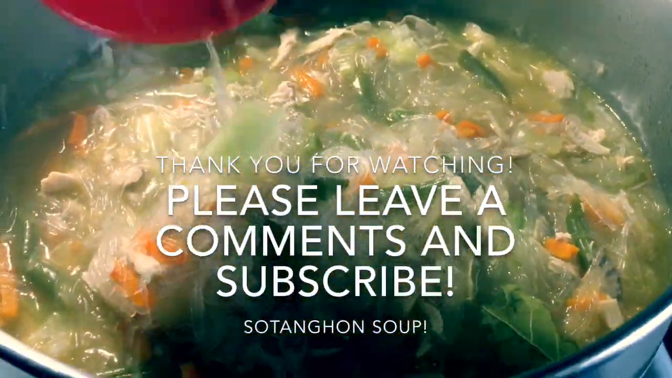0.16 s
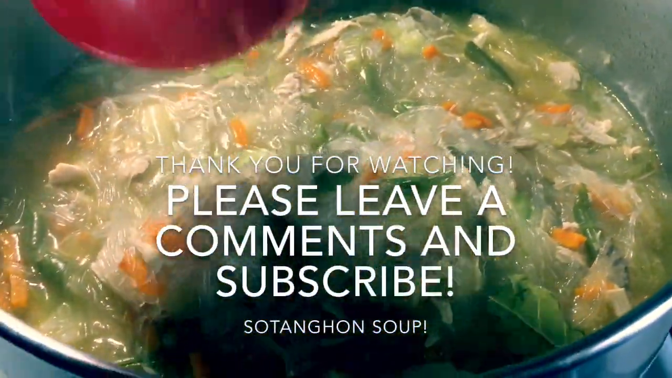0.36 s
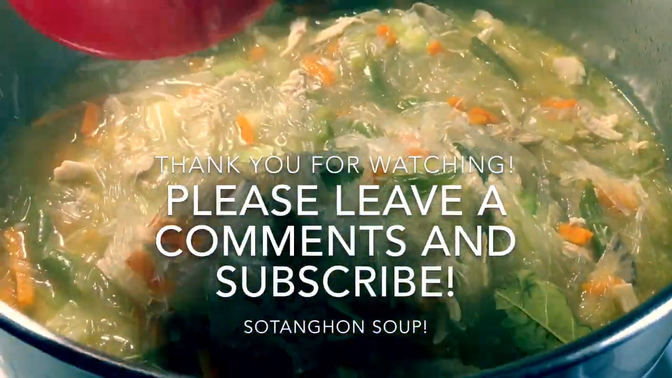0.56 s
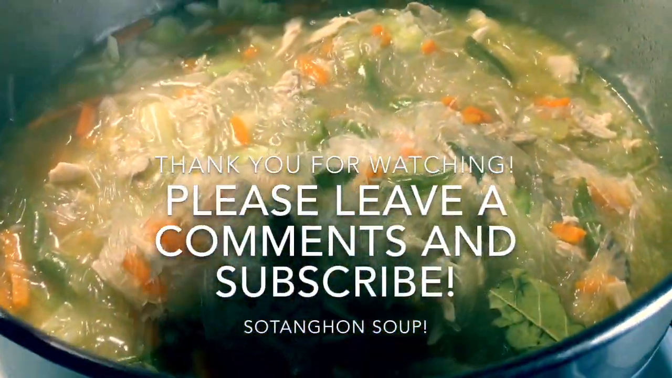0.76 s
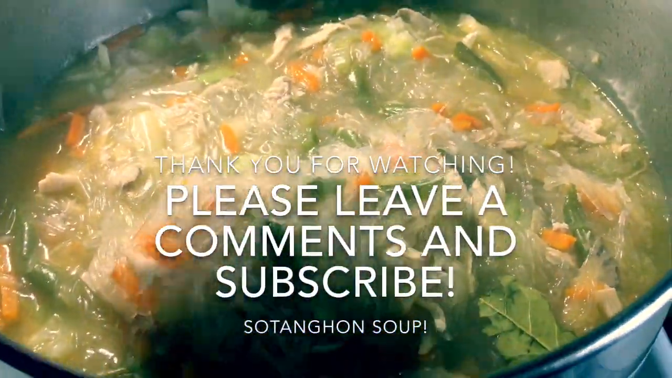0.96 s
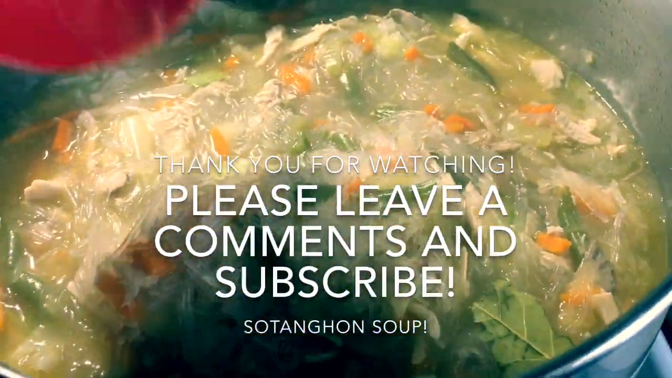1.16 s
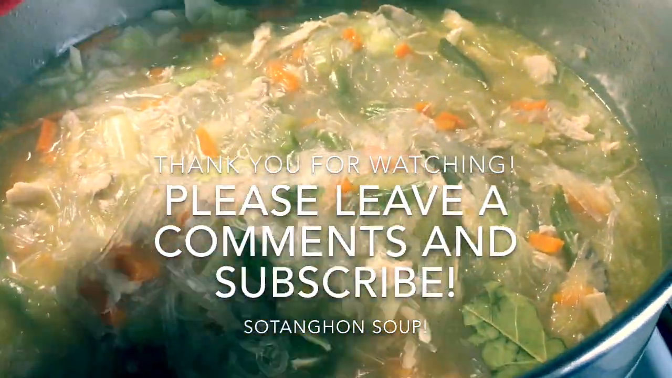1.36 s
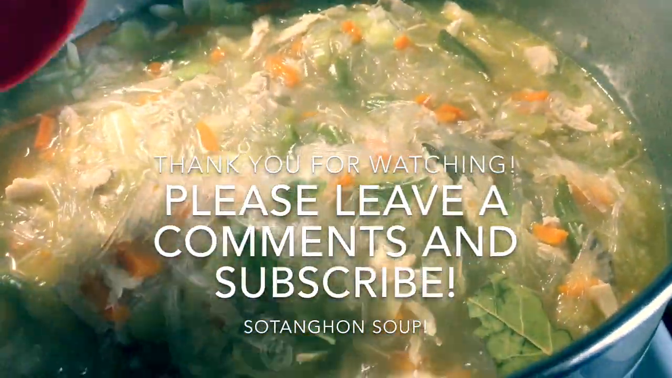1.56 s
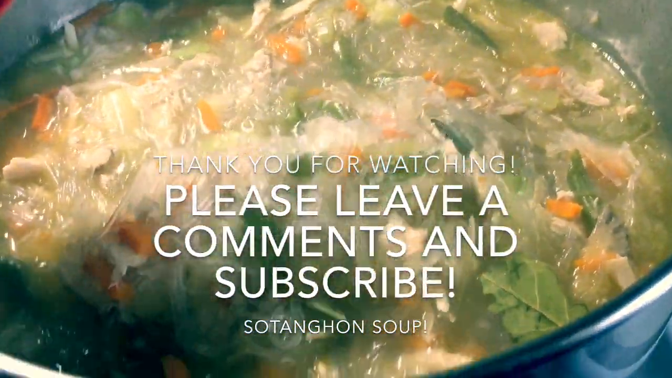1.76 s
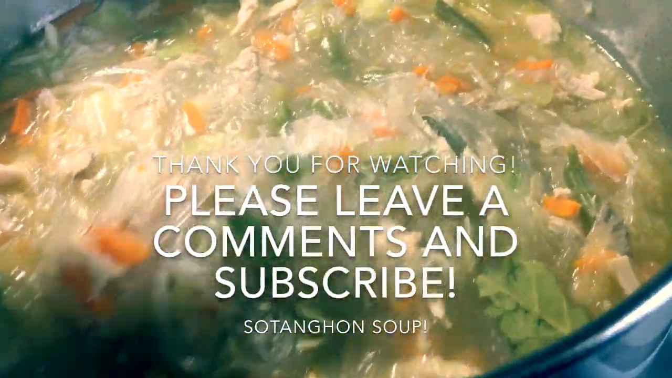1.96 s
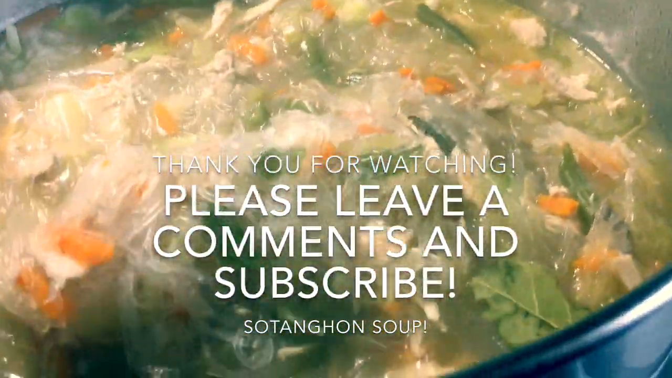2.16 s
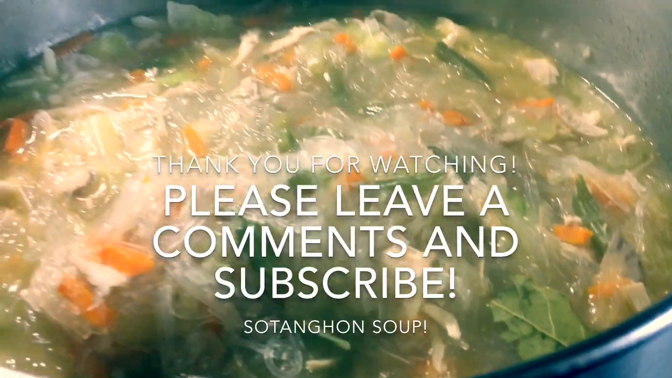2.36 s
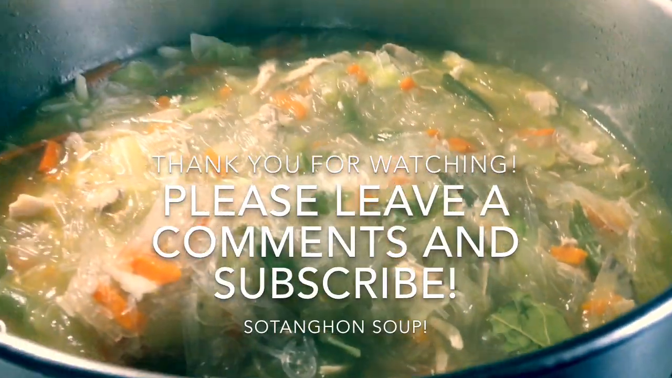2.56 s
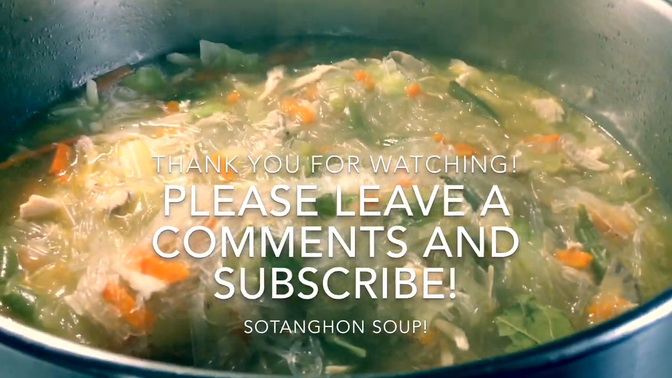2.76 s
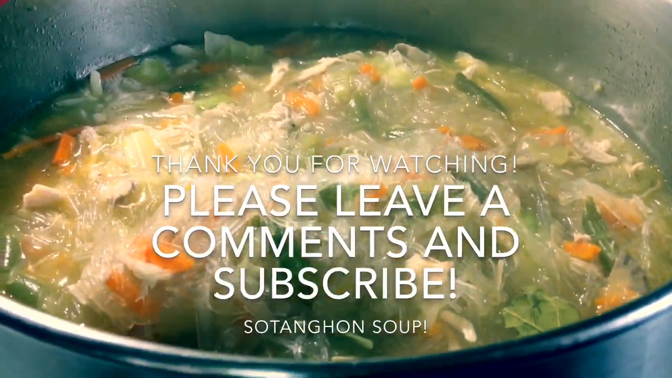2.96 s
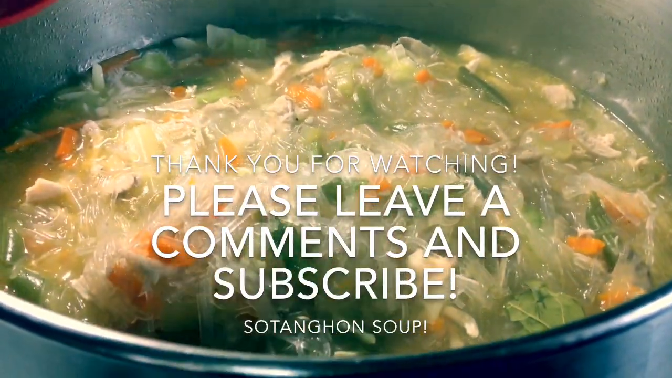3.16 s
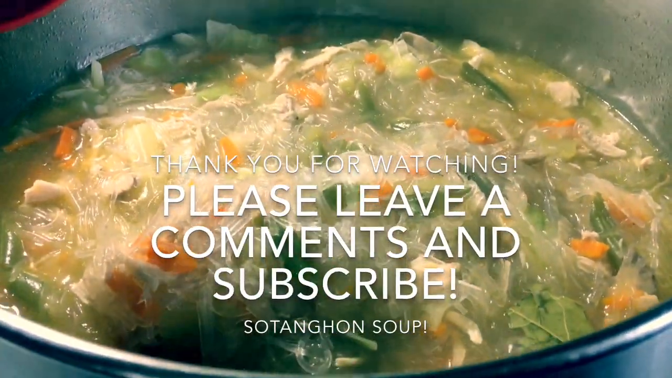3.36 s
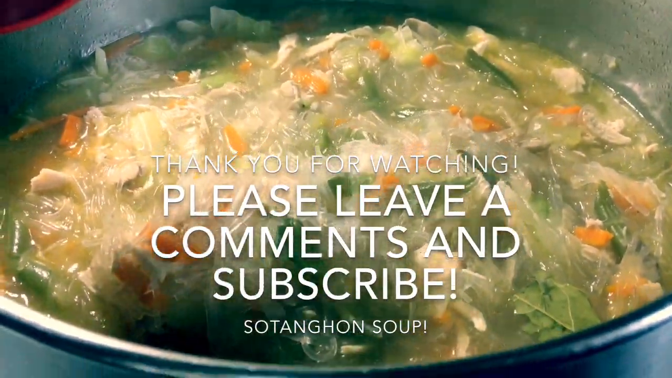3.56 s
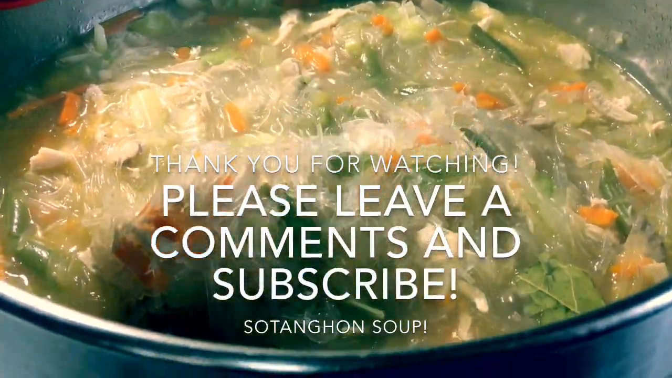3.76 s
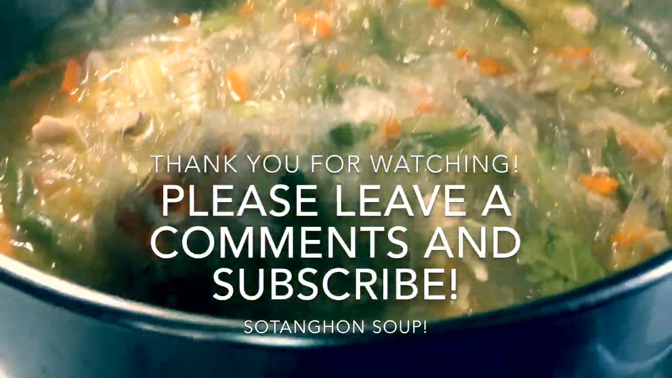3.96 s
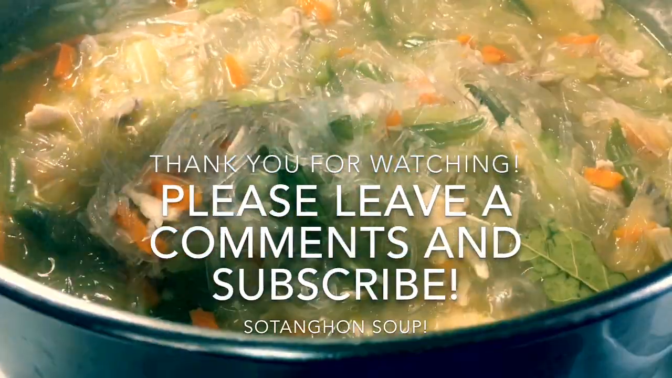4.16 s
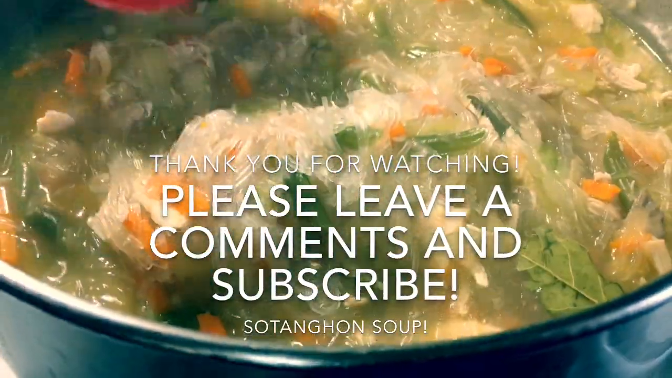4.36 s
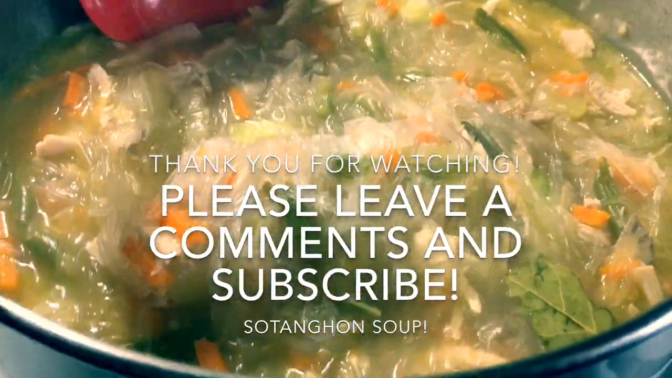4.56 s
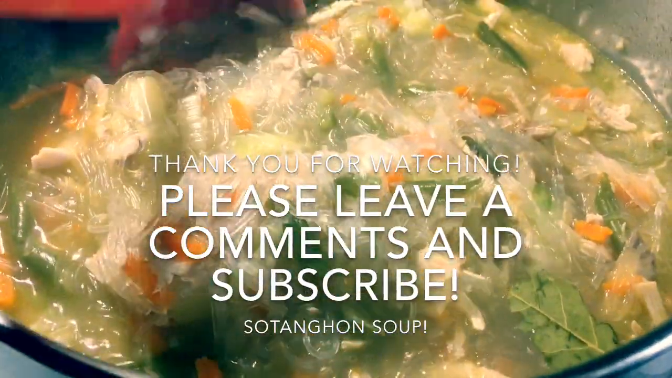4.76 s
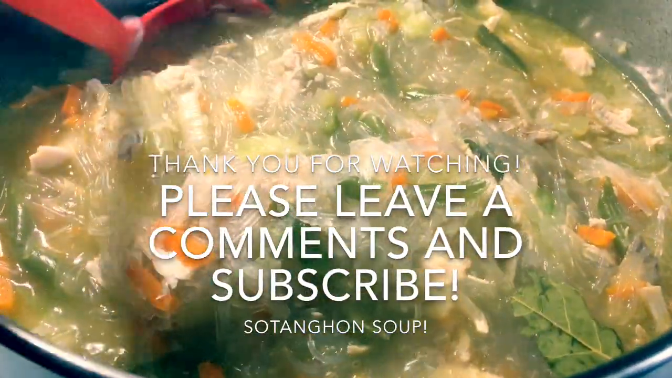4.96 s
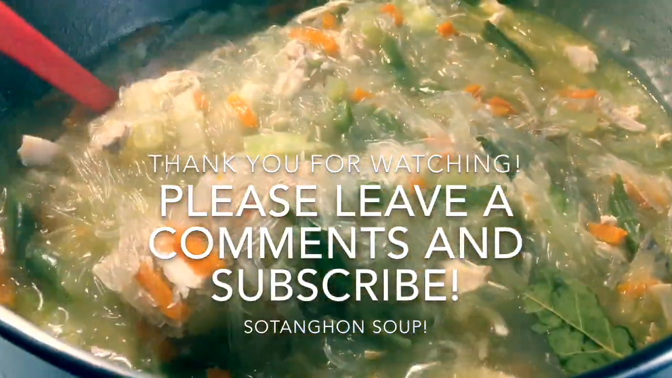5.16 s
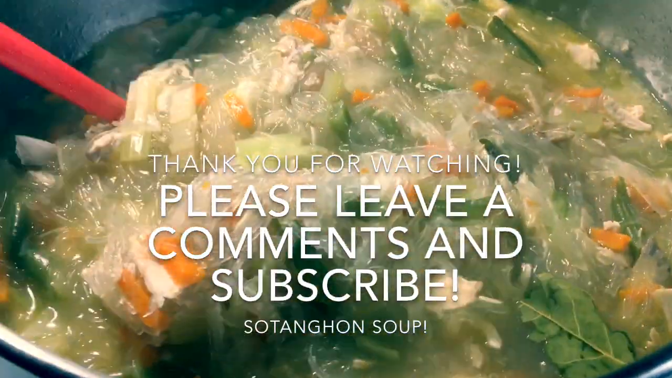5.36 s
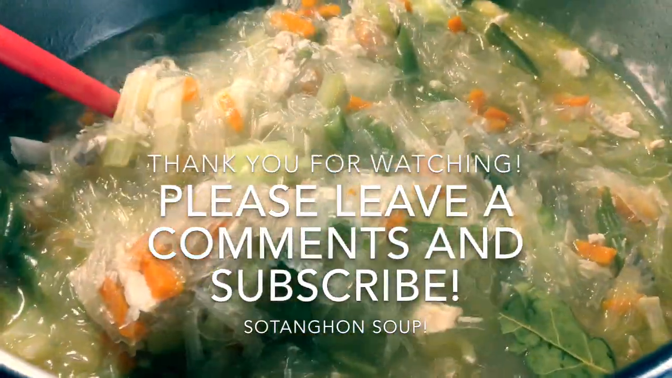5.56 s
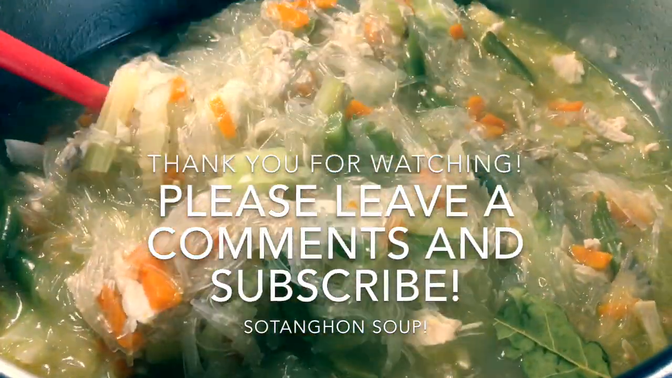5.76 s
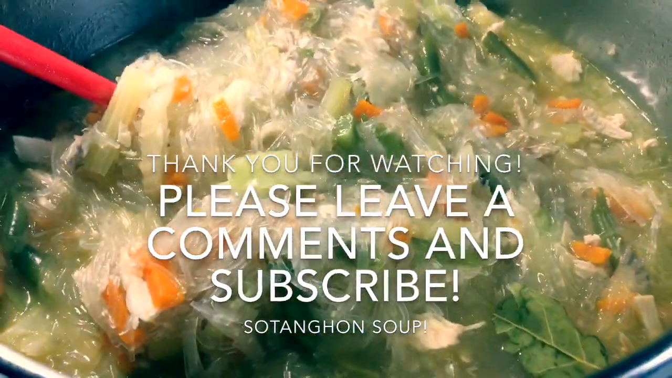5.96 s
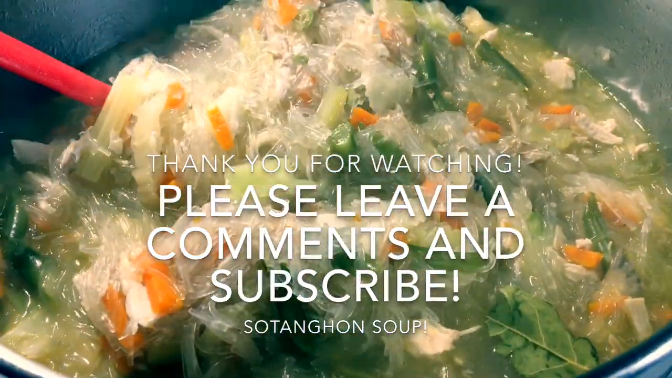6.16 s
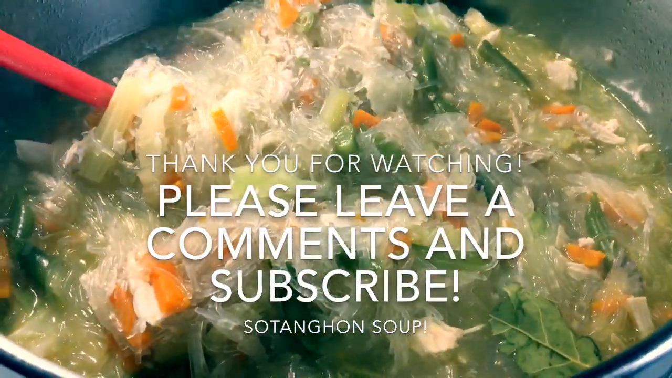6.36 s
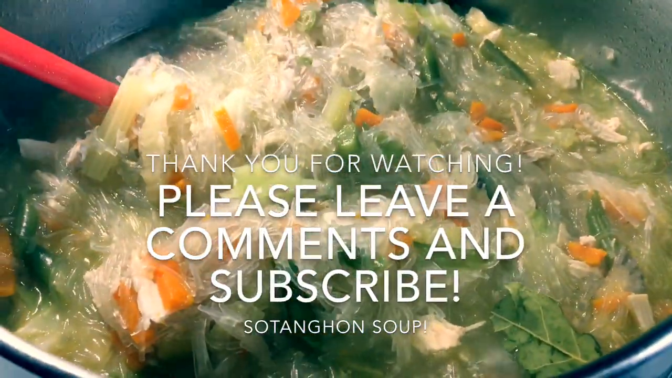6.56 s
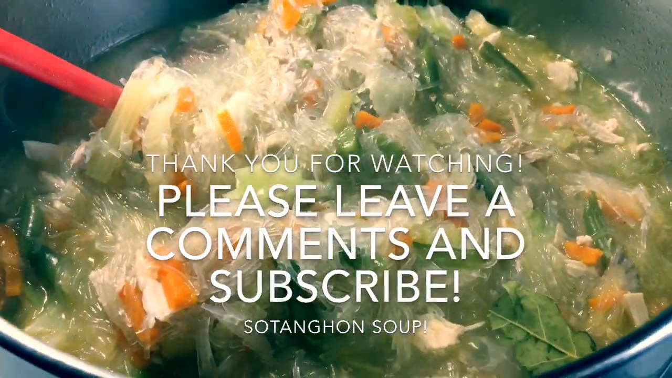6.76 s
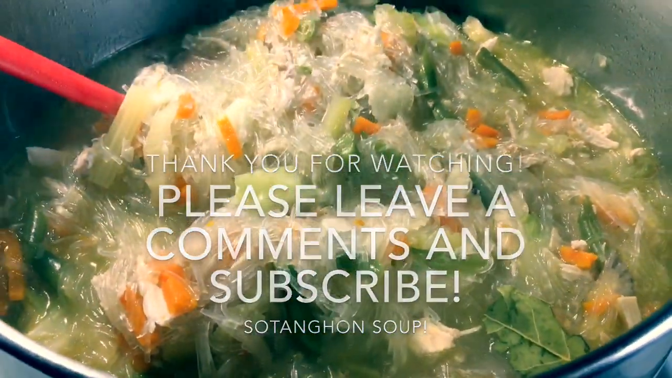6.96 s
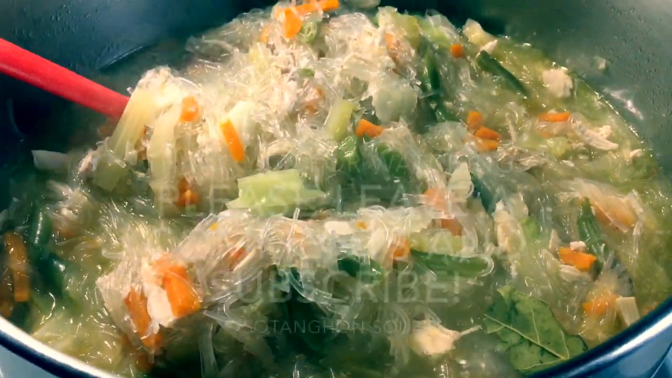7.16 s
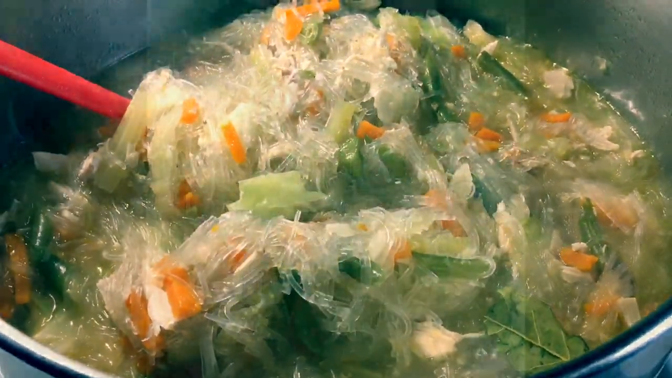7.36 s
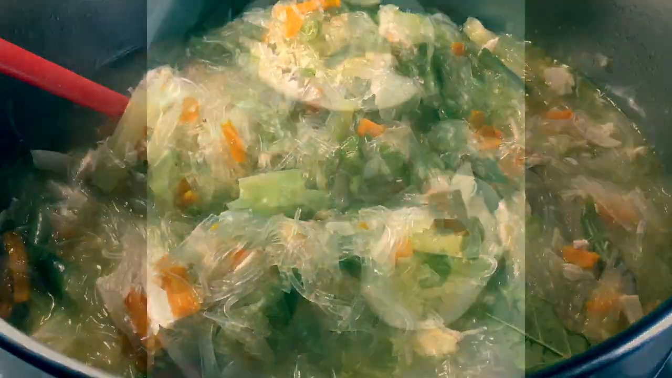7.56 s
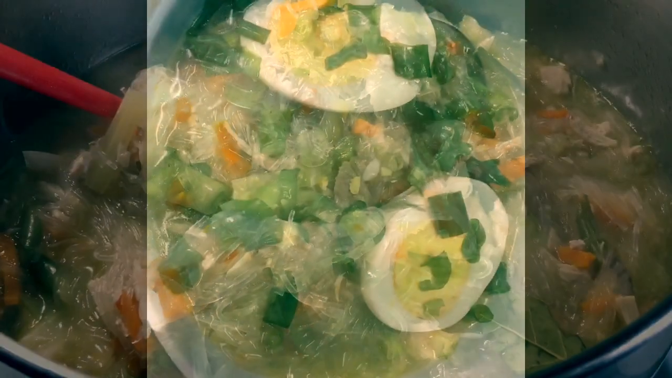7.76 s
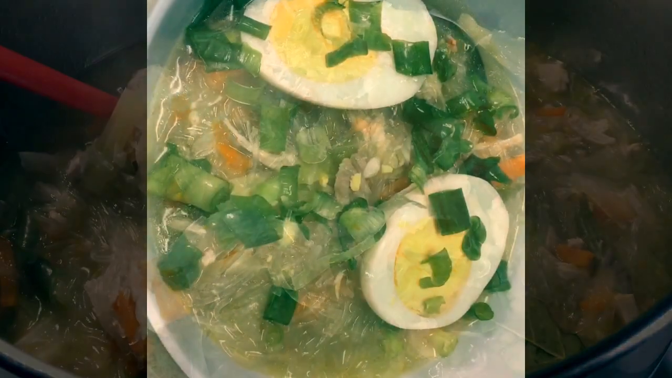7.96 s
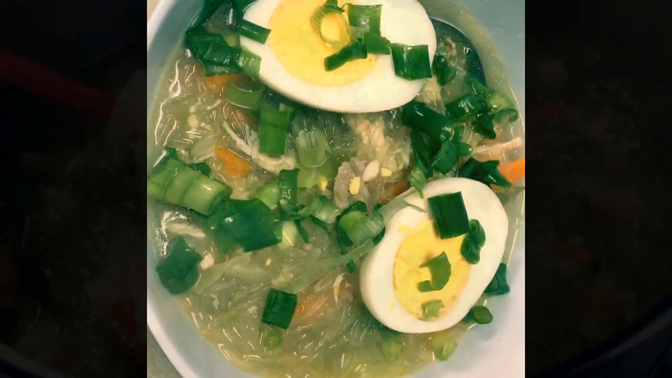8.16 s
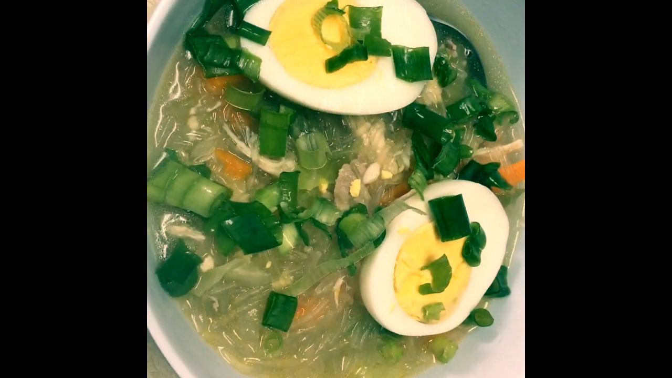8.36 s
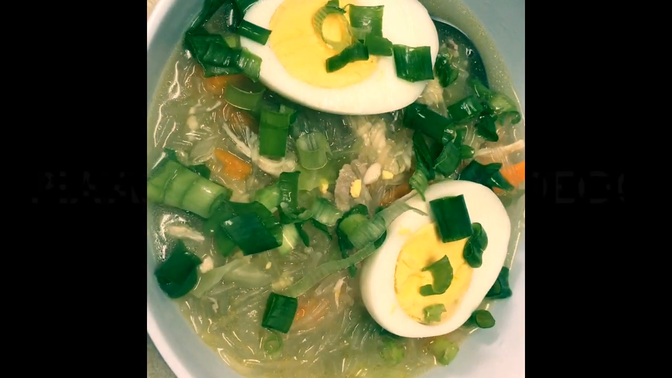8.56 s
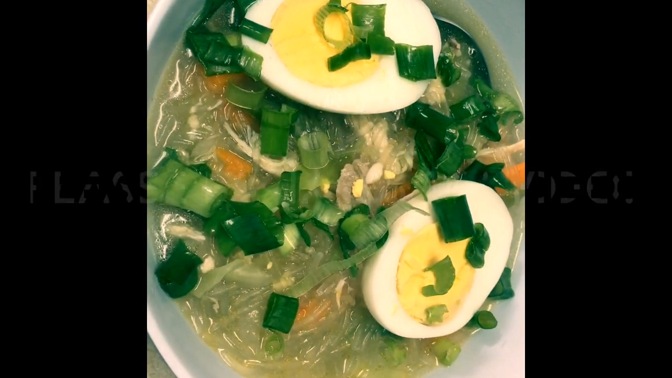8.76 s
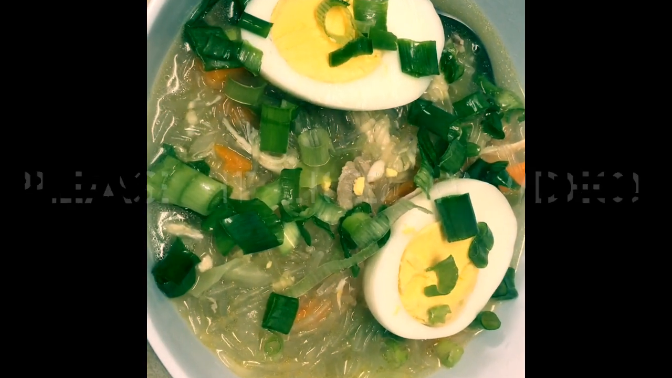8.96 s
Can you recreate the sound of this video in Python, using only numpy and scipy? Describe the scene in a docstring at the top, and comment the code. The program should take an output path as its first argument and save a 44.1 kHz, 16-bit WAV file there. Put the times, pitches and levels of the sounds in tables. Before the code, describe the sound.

Thick noodle soup simmers with tiny snaps and wet plops over a gas burner; a plastic ladle knocks the steel pot, then quiet room hum.

```python
"""Noodle soup on a gas ring

Thick soup simmers in a steel pot: ringing cavities make the small snaps, larger plops and runs of bubbles.
A plastic ladle dips in with a dull knock, pushes through the noodles and clacks against the wall: decaying
modes ring pot and ladle, and dense random bubbles squelch. Shaped noise makes the burner.
Near the end the simmer fades out and leaves a quiet room of soft noise, with an electrical hum of steady
sines, faint falling chirps and rustles."""
import sys
import numpy as np
from scipy import signal
from scipy.io import wavfile

SR = 44100
rng = np.random.default_rng(int(sys.argv[2]) if len(sys.argv) > 2 else 0)


def log_audio(samples):
    """Write samples as a 16-bit WAV file to the path given in sys.argv[1]."""
    # one column per channel
    frames = np.atleast_2d(samples).T
    # limit to full scale, then quantise
    limited = np.clip(frames, -1, 1)
    pcm = np.round(limited * 32767).astype(np.int16)
    wavfile.write(sys.argv[1], SR, pcm)


N = 396459
TIME_S = np.arange(N) / SR
DECAY_60_DB = np.log(1000)  # exponent of a 60 dB decay


def bubble(hz, cycles, rise, opening):
    """Cavity resonance: it opens within a cycle or so and rings down, its pitch rising as the hole widens."""
    turn = np.arange(int(cycles / hz * SR) + 2) * hz / SR
    opened = 1 - np.exp(-(turn / opening) ** 2)
    ring = np.sin(2 * np.pi * turn * (1 + rise * turn / cycles))
    return opened * np.exp(-DECAY_60_DB * turn / cycles) * ring


# loudest small bubbles on the surface:
# (time [s], relative level [dB], pitch [Hz], relative level of the tick as the film tears [dB])
SMALL_BUBBLES = [(0.3062, -36.5, 6760.0, -66), (0.3729, -31, 7300, -42), (0.4867, -38.5, 7500, -57),
                 (0.541, -37.5, 5890.0, -67), (0.6543, -41, 6860, -52), (0.9343, -39.5, 6140, -46),
                 (0.988, -46, 13360.0, -43), (1.011, -37, 5330, -50), (1.1132, -42.5, 6900, -65),
                 (1.3028, -37.5, 7250, -67), (1.3976, -42.5, 3320, -54), (1.5477, -36, 8000, -67.0),
                 (1.6976, -43.5, 4800, -48.5), (1.805, -40.5, 5740.0, -68), (1.9174, -36.5, 10500, -72.0),
                 (2.0127, -39.5, 7000, -56), (2.031, -37, 7300, -61.0), (2.143, -35, 6370, -69.0),
                 (2.221, -37.5, 5740.0, -56), (2.2273, -51, 6940.0, -45), (2.3858, -38, 6220.0, -66),
                 (2.4387, -36, 9900.0, -72.0), (2.5358, -42, 5800, -62.0), (2.545, -40.5, 5000, -55),
                 (2.5553, -44, 4970, -68), (2.7593, -40, 4600, -61.0), (2.7723, -44, 4640, -41),
                 (2.8054, -39, 7900, -61), (3.001, -40.5, 9000, -62.0), (3.054, -39.5, 6400, -69),
                 (3.1464, -39, 6060, -67), (3.329, -41.5, 4540, -53), (3.3885, -39.5, 5930, -55),
                 (3.4352, -50, 3610.0, -46), (3.526, -37.5, 6600, -68.0), (3.6186, -40.5, 6370, -50),
                 (3.7715, -48, 2870, -41.5), (3.8775, -33, 5800, -53), (3.8967, -41, 4610.0, -67),
                 (4.032, -34, 10170.0, -51), (4.1719, -36, 7600, -61), (4.203, -48, 3000, -45),
                 (4.2526, -35, 6500, -56), (4.2668, -39, 5430.0, -72.0), (4.326, -41, 4100, -64),
                 (4.3606, -38, 7940, -59), (4.3904, -54, 7330.0, -46), (4.4264, -33, 10300, -74),
                 (4.5057, -38, 6350, -43), (4.5219, -39, 6260, -63.0), (4.664, -41.5, 3670, -70),
                 (4.82, -40.5, 4700, -58), (4.8827, -56, 2870, -46), (5.1823, -39, 7300, -61.0),
                 (5.1945, -34, 6060.0, -61), (5.227, -40, 9010, -58), (5.2638, -39, 5615, -67),
                 (5.2988, -38, 3530, -53), (5.5367, -39.5, 5890.0, -56), (5.758, -42, 5630, -55),
                 (5.7886, -41, 10000, -57.0), (5.8143, -37.5, 8300, -57), (6.1035, -41.5, 8700, -48),
                 (6.2323, -36.5, 6100, -56), (6.4822, -35, 5850, -58), (6.4937, -35.5, 7700, -60.0),
                 (6.837, -40.5, 3500, -46), (6.929, -41, 4570, -52), (7.1705, -40.5, 10170.0, -72.0),
                 (7.207, -43, 3320.0, -53), (7.3085, -42, 4580, -76), (7.4432, -40, 7500, -72.0),
                 (7.6476, -39, 6400, -61), (7.776, -44, 4970, -65.5), (7.8613, -50, 4000, -64.5),
                 (7.9005, -48, 4740, -74)]
SNAP_CYCLES = 11.93  # cycles to decay by 60 dB
# weaker snaps come at random: rate at mean vigour, level of the strongest, range of sizes, range of pitch
SNAPS_PER_S, SMALL_SNAP_DB, SNAP_RANGE_DB = 10, -35, 8.5
SNAP_LOW_HZ, SNAP_HIGH_HZ = 3000, 9400
SNAP_RATE_FOLLOWS = 1.1  # dB of rate (20 log) per dB of vigour


def snaps(vigour_db, stove, level_db, tear_db, tear_s, small_tear_db):
    """Film rupture excites a cavity: a broad tick, then a tiny ring; a livelier simmer snaps more often."""
    events = [(s, from_db(db + level_db), hz, from_db(tick_db + tear_db))
              for s, db, hz, tick_db in SMALL_BUBBLES]
    per_s = SNAPS_PER_S * from_db(SNAP_RATE_FOLLOWS * vigour_db)
    chances = rng.random((600, 4))
    for when, luck, size, pitch in chances:
        i = int(when * N)
        if luck < per_s[i] * N / SR / len(chances):
            gain = stove[i] * from_db(SMALL_SNAP_DB - SNAP_RANGE_DB * size)
            hz = SNAP_LOW_HZ * (SNAP_HIGH_HZ / SNAP_LOW_HZ) ** pitch
            events.append((i / SR, gain, hz, gain * from_db(small_tear_db)))
    out, t = np.zeros(N), np.arange(SR // 100) / SR
    tear_shape = (1 - np.exp(-2 * t / tear_s)) * np.exp(-t / tear_s)
    for (s, gain, hz, tick), hiss in zip(events, rng.standard_normal((len(chances), len(t)))):
        add(out, s, gain * bubble(hz, SNAP_CYCLES, rise=0.04, opening=0.82))
        add(out, s, tick * cut(hiss, hz, "high") * tear_shape)
    return out


# loudest large bubbles and drops: (time [s], relative level [dB], pitch [Hz], ringing [cycles],
# relative level of the tick as the skin tears [dB])
LARGE_BUBBLES = [(0.7985, -39, 700.0, 3.8, -74), (0.8183, -34, 1000, 3.5, -57),
                 (0.976, -42, 1050, 7.9, -62), (1.0897, -37, 1150, 2.1, -74), (1.1836, -36, 1050, 7, -74),
                 (1.4467, -43.5, 900, 10, -44.5), (1.6054, -36.5, 1270, 2, -67),
                 (2.054, -43, 690, 3.7, -74), (2.1768, -40.5, 1330, 2.7, -72),
                 (2.4639, -30, 1010, 2.1, -54), (2.6455, -45, 1830, 2.2, -36.5),
                 (2.6745, -34, 1260, 4.1, -51), (2.6975, -43, 590, 5, -48), (2.9846, -38, 1670, 1.1, -46.5),
                 (3.1285, -36, 2460.0, 12, -48), (3.29, -31, 1940, 0.5, -56),
                 (3.4414, -38, 1600.0, 0.75, -46.5), (3.5897, -35.5, 1150, 11, -70),
                 (3.664, -41, 1170, 3.6, -42.5), (3.8524, -43.5, 820.0, 2.4, -72),
                 (3.9823, -39, 2300, 4.7, -41.5), (4.2084, -37, 776, 4.5, -46),
                 (4.272, -43.5, 627, 10, -58), (4.3418, -43.5, 910, 7, -72), (4.67, -34.0, 890, 2.5, -44.5),
                 (4.9341, -32.5, 1450, 2.1, -59), (4.9613, -39, 1040, 16, -74), (4.9787, -38, 1020, 5, -67),
                 (5.109, -41.5, 1010, 11, -76), (5.1647, -31, 1300, 9.6, -58),
                 (5.1745, -33.5, 1600.0, 6.8, -39), (5.3793, -27, 1250, 4.3, -35),
                 (5.417, -35.5, 1750, 3.9, -53), (5.426, -48, 1650.0, 3, -39), (6.0675, -47, 1120, 19, -49),
                 (7.255, -46, 500, 14, -74)]


def plops(level_db, daughter_db, daughter_s, daughter_ratio, tick_db, tick_s):
    """Damped cavity resonance in thick broth: the skin ticks as it tears and leaves smaller, higher bubbles."""
    out, ticks, t = np.zeros(N), np.zeros(N), np.arange(SR // 20) / SR
    for (s, db, hz, cycles, skin_db), daughters in zip(LARGE_BUBBLES, rng.random((len(LARGE_BUBBLES), 3, 2))):
        padded = np.pad(bubble(hz, cycles, rise=0.01, opening=0.53), (0, len(t)))
        ring = cut(padded, hz * .3, "high")
        add(out, s, from_db(db + level_db) * ring / np.abs(ring).max())
        for when, pitch in daughters:
            daughter = bubble(hz * daughter_ratio ** pitch, cycles=6.7, rise=0.06, opening=0.6)
            add(out, s + daughter_s * when, from_db(db + daughter_db) * daughter)
        add(ticks, s, from_db(skin_db + tick_db) * rng.standard_normal(len(t)) * np.exp(-t / tick_s))
    return cut(out, 3800, "low", order=4) + cut(ticks, [2200, 8000], "band")


# clumps bursting in a quick run: (start [s], upper limit of bubble level [dB], central pitch [Hz], length [s])
FROTH_CLUMPS = [(1.608, -42, 1700, 0.011), (4.86, -32.5, 6500, 0.036), (4.99, -39, 1410, .016),
                (5.184, -33, 6700, 0.0082), (6.757, -34.5, 5900, .016), (7.2, -42, 320, .13),
                (7.231, -43, 1700, .1), (7.42, -36, 7700, .062), (7.452, -39, 2700, 0.022),
                (7.612, -38.5, 6760, .03)]


def clusters(spread_octaves, spread_db, cycles, count):
    """Successive cavity resonances: a clump of froth gives way, its bubbles bursting one after another."""
    out = np.zeros(N)
    for (s, db, hz, length_s), chances in zip(FROTH_CLUMPS, rng.random((len(FROTH_CLUMPS), count, 3))):
        for k, (when, size, pitch) in enumerate(chances):
            ring = bubble(hz * 2 ** (spread_octaves * (pitch - .5)), cycles, rise=0.05, opening=0.6)
            add(out, s + length_s * (k + when) / count, from_db(db - spread_db * size) * ring)
    return out


def swarm(per_s, low_hz, high_hz, cycles, spread_db):
    """Random superposition: bubbles of random size, pitch and moment, at most 4000 in all; rms 1."""
    out = np.zeros(N)
    for when, size, pitch, length in rng.random((4000, 4))[:int(per_s * N / SR)]:
        hz = min(low_hz * (high_hz / low_hz) ** pitch, SR / 3)
        ring = bubble(hz, cycles * (.5 + length), rise=0.042, opening=0.75)
        add(out, when * N / SR, from_db(spread_db * size ** 2) * ring)
    return rms_one(out)


# vigour of the simmer, used relative to its mean: (time [s], relative level [dB])
SIMMER_CURVE = [(0.0, -71.5), (0.75, -72.5), (4.07, -66), (4.3, -69), (7.37, -72)]


def simmer_vigour():
    """Slow modulation: the simmer's departure from its mean vigour in dB."""
    s, db = np.transpose(SIMMER_CURVE)
    simmer_db = np.interp(TIME_S, s, db)
    return simmer_db - simmer_db.mean()


# levels at mean vigour, and dB gained for each dB of vigour
BUBBLING_DB, POPPING_DB, FIZZ_DB = -64, -70.5, -73.5
BUBBLING_FOLLOWS, FIZZ_FOLLOWS = 0.91, 0.75


def simmer(vigour_db):
    """Cavity size sets pitch: returns low bubbling with rarer middle popping, and sparse high fizz."""
    swing = from_db(BUBBLING_FOLLOWS * vigour_db)
    bubbling = from_db(BUBBLING_DB) * swarm(per_s=200, low_hz=433, high_hz=1129, cycles=9, spread_db=12.5)
    popping = from_db(POPPING_DB) * swarm(per_s=110, low_hz=900, high_hz=3800, cycles=5.5, spread_db=7.5)
    fizz_gain = from_db(FIZZ_DB + FIZZ_FOLLOWS * vigour_db)
    fizz = fizz_gain * swarm(per_s=55, low_hz=4200, high_hz=14500, cycles=12, spread_db=16)
    return swing * (bubbling + popping), fizz


# pushes of the ladle through the noodles: (time at full speed [s], relative level [dB])
LADLE_PUSHES = [(4.52, -56), (4.92, -50), (5.36, -50.5)]
PUSH_ATTACK_S, PUSH_SETTLE_DB_PER_S = 0.085, 71.5
# soft hiss as broth runs over the hot wall: (time [s], relative level [dB], length [s])
BROTH_WASH = (5.04, -68.5, 0.083)


def stirring(hiss_db, slip_db, slip_rate):
    """Stick-slip flow: noodles and broth squelch in fits; each push builds quickly, then the soup settles."""
    effort = 0
    for s, db in LADLE_PUSHES:
        settling = from_db(-PUSH_SETTLE_DB_PER_S * np.abs(TIME_S - s))
        effort = effort + from_db(db) * np.where(TIME_S < s, swell(s, PUSH_ATTACK_S), settling)
    bubbles = swarm(per_s=510, low_hz=300, high_hz=5940, cycles=5.4, spread_db=11.5)
    squelch = cut(bubbles, 2800, "low", order=1)
    wash_s, wash_db, wash_length_s = BROTH_WASH
    wash_hiss = cut(rng.standard_normal(N), 3600, "high", order=1)
    wash = from_db(wash_db) * swell(wash_s, wash_length_s) * wash_hiss
    slip = from_db(slip_db * drift(slip_rate))
    wet_hiss = from_db(hiss_db) * rng.standard_normal(N)
    return slip * (effort * (squelch + wet_hiss) + wash)


def struck(modes, build_cycles):
    """Modal superposition: decaying sines of alternating sign that take some cycles to build up."""
    t, out = np.arange(SR // 2) / SR, 0
    for k, (hz, db, t60) in enumerate(modes):
        envelope = from_db(db - 60 * t / t60) * (1 - np.exp(-hz * t / build_cycles))
        out = out + envelope * np.sin(2 * np.pi * hz * t) * (-1) ** k
    return out


def struck_at(modes, place):
    """Modal excitation: strengths for a blow between the floor (0) and the wall (1) of the pot."""
    return [(hz, np.interp(place, [0, 1], [floor_db, wall_db]), t60) for hz, floor_db, wall_db, t60 in modes]


# ladle on pot; the ladle rings lower under the soup: (time [s], relative pot level [dB],
# relative ladle level [dB], ladle pitch [Hz], contact cut-off [Hz], place [0 floor to 1 wall])
LADLE_BLOWS = [(4.4794, -36, -20.5, 2060, 9300, 0.042), (4.4811, -25.5, -13.5, 1110, 2300, 0.33),
               (5.3102, -30, -2, 1577, 6800, 1)]
# filled pot: (frequency [Hz], relative level on floor [dB], relative level on wall [dB], t60 [s])
POT_MODES = [(178.5, -25, -9, 0.3), (295.7, -2, -14.5, 0.45), (348, -19, -17, 0.31),
             (435, -26, -17.5, 0.46), (486, -9.5, -14.5, 0.086), (560, -20, -10.5, 0.23),
             (661, -14, -7, 0.12), (738, -23, -11.5, 0.17), (824, -17, -11.5, 0.14),
             (933, -20, -15.5, 0.26), (1040, -1.5, -8.5, 0.18), (1126, -10, -9, 0.16), (1281, 6, -16, 0.12),
             (1565, -4, -4.5, 0.043), (1640, -19, -17.5, 0.087), (1750, -9, -12.5, 0.1),
             (1960, -32, -21.5, .16), (2090, -27, -16.5, 0.2), (2570, -21, -11.5, 0.07),
             (2980, -33, -12, .11), (3630, -29, 0.5, 0.06), (4260, -32, -15.5, .1),
             (5640, -35, -6.5, 0.098), (6170, -29, -12.5, 0.11)]
# pot rocking on the grate with a low thud: (frequency [Hz], relative level on floor [dB],
# relative level on wall [dB], t60 [s])
ROCKING_MODES = [(78, -30, -2, .25), (108.6, -12, 2.5, 0.3), (140, -7, 0.5, 0.14)]
# plastic ladle: (multiple of its pitch [ratio], relative level [dB], t60 [s])
LADLE_MODES = [(1.002, -6.5, 0.023), (1.08, -6.5, .016), (1.58, -10, 0.013), (2.32, -18.5, .007),
               (2.76, -12, .01), (3.36, -11, .009), (3.88, -8, .012)]


def knocks(crack_db, crack_s, clatter_db, clatter_t60, rattle_db, wall_rattle_db, rattle_t60,
           chatter_db, chatter_rate):
    """Impact excitation: contact rings pot and ladle and rocks the pot; a cushioned one passes less treble."""
    out, t = np.zeros(N), np.arange(SR // 2) / SR
    for s, pot_db, ladle_db, ladle_hz, contact_hz, place in LADLE_BLOWS:
        pot = struck(struck_at(POT_MODES, place), build_cycles=.5)
        pot = pot + struck(struck_at(ROCKING_MODES, place), build_cycles=4.2)
        ladle_modes = [(ratio * ladle_hz, db, t60) for ratio, db, t60 in LADLE_MODES]
        ladle = from_db(ladle_db) * struck(ladle_modes, build_cycles=0.38)
        crack = from_db(ladle_db + crack_db) * rng.standard_normal(len(t)) * np.exp(-t / crack_s)
        # the countless higher modes of the steel wall merge into a short clatter
        dense = rms_one(cut(rng.standard_normal(len(t)), [900, 6600], "band", order=5))
        clatter = from_db(ladle_db + clatter_db) * dense * np.exp(-DECAY_60_DB * t / clatter_t60)
        # pot and grate rattle on, lower and longer, with a boost towards the wall
        grate = rms_one(cut(rng.standard_normal(len(t)), [220, 2200], "band", order=5))
        rattle_gain = from_db(pot_db + rattle_db + place * wall_rattle_db)
        rattle = rattle_gain * grate * np.exp(-DECAY_60_DB * t / rattle_t60)
        # the ladle chatters along the steel, which roughens both tails
        chatter = from_db(chatter_db * drift(chatter_rate)[:len(t)])
        contact = from_db(pot_db) * pot + ladle + crack + chatter * (clatter + rattle)
        add(out, s, cut(contact, contact_hz, "low"))
    return out


# echoes off the pot wall and the hood above: (delay [s], gain [ratio])
POT_ECHOES = [(.0007, 0.088), (.0018, .17), (.0095, .1), (0.0126, .12)]


def pot_wall(x):
    """Early reflection: quick echoes inside the pot and from the hood."""
    out = x.copy()
    for delay, gain in POT_ECHOES:
        add(out, delay, gain * x)
    return out


def kitchen(x, near_db, near_t60, room_db, room_t60, dull_hz):
    """Reverberation: scatter from stove and hood, then the longer, duller tail of the room."""
    t = np.arange(SR // 2) / SR
    near, far = rng.standard_normal((2, len(t))) * (1 - np.exp(-(t / 0.0012) ** 2))
    near = from_db(near_db) * rms_one(near * np.exp(-DECAY_60_DB * t / near_t60))
    far = from_db(room_db) * rms_one(far * np.exp(-DECAY_60_DB * t / room_t60))
    response = (near + cut(far, dull_hz, "low", order=1)) / np.sqrt(len(t))
    return x + signal.fftconvolve(x, response)[:N]


# resonances of the stove corner and the air above the soup: (frequency [Hz], width [Hz], level [dB])
AIR_RESONANCES = [(51, 12, 7), (173.7, 110, 7), (310, 46, 8.5), (630, 160, 5.5), (1053, 84, 12.5),
                  (1574, 55, 7.5), (2130, 330, 8.5), (6350, 830, 9)]


def pot_air(x):
    """Acoustic resonance: the open space above the soup favours a few bands."""
    out = x.copy()
    for hz, width, db in AIR_RESONANCES:
        out += (from_db(db) - 1) * signal.lfilter(*signal.iirpeak(hz, hz / width, fs=SR), x)
    return out


# spectrum of the burner noise: (frequency [Hz], relative level per Hz [dB])
BURNER_SPECTRUM = [(21, -30), (35, 8.5), (120, -2.5), (239, -6.5), (309, -7), (405, -9), (700, -12),
                   (862, -20), (1090, -28.5), (1400, -17), (2170, -26), (2870, -25), (6360, -35),
                   (16000, -36)]
STOVE_DB = -57.5  # rms level before the air resonances


def burner():
    """Broadband noise through resonances: the gas ring's flickering noise, coloured by the air above."""
    return from_db(STOVE_DB) * pot_air(coloured_noise(BURNER_SPECTRUM, flicker_db=1.0))


# spectrum of the quiet room: (frequency [Hz], relative level per Hz [dB])
ROOM_SPECTRUM = [(35, -13), (52, 4), (85, -9), (125, -1), (200, -8), (340, -21), (500, -20), (1150, -28.5),
                 (2500, -32), (3300, -34), (16000, -42)]
QUIET_DB = -58.5


def quiet_room():
    """Background noise: soft broadband noise whose bands flicker separately."""
    return from_db(QUIET_DB) * coloured_noise(ROOM_SPECTRUM, flicker_db=2.1)


# electrical hum: (frequency [Hz], level with the stove [dB], level in the quiet room [dB])
HUM_TONES = [(118.5, -57.5, -61.5), (238.5, -90.5, -56.5), (350, -90, -77)]


def hum(stove):
    """Tonal superposition: steady low sines whose balance shifts as the stove fades."""
    out = 0
    for hz, stove_db, quiet_db in HUM_TONES:
        gain = stove * from_db(stove_db) + (1 - stove) ** 1.5 * from_db(quiet_db)
        out = out + gain * np.sin(2 * np.pi * hz * TIME_S)
    return out


CHIRP_FIRST_S, CHIRP_REPEAT_S = 8.04, .22
CHIRP_HZ, CHIRP_FALL_HZ_PER_S, CHIRP_DB = 3200, 4000, -74  # pitch at the middle of each chirp


def chirps(length_s, width_hz):
    """Frequency and amplitude modulation: evenly repeated, wavering chirps slide down in pitch."""
    out = 0
    waver = rms_one(cut(rng.standard_normal(N), width_hz, "low"))
    for s in np.arange(CHIRP_FIRST_S, N / SR, CHIRP_REPEAT_S):
        since = TIME_S - s
        cycles = (CHIRP_HZ - CHIRP_FALL_HZ_PER_S * since / 2) * since
        out = out + swell(s, length_s) * np.sin(2 * np.pi * cycles)
    return from_db(CHIRP_DB) * waver * out


# faint far-off rustles: (time [s], relative level [dB], centre frequency [Hz], length [s])
FAR_RUSTLES = [(8.6, -71, 1100, 0.055), (8.772, -65, 1114, 0.026), (8.946, -70, 1145, 0.031)]


def rustles(width):
    """Band-limited noise: soft puffs in the mid-range."""
    return sum(from_db(db) * swell(s, length_s) * narrow_noise(hz, width) for s, db, hz, length_s in FAR_RUSTLES)


def coloured_noise(spectrum, flicker_db):
    """Band synthesis: half-octave noise bands, each flickering on its own; rms 1."""
    points_hz, points_db = np.transpose(spectrum)
    edges = 24 * 2 ** (np.arange(20) / 2)
    white, out = rng.standard_normal((2, N)), 0
    for k, band in enumerate(zip(edges, edges[1:])):
        level_db = np.interp(np.mean(np.log(band)), np.log(points_hz), points_db)
        flicker = flicker_db * drift(20)
        # neighbouring bands draw on different noise
        out = out + cut(white[k % 2], band, "band") * from_db(level_db + flicker)
    return rms_one(out)


def narrow_noise(hz, width):
    """Band-pass filtering: noise whose width is a share of its centre; rms 1."""
    return rms_one(cut(rng.standard_normal(N), [hz / (1 + width / 2), hz * (1 + width / 2)], "band"))


def swell(s, length_s):
    """Gaussian envelope: a smooth rise and fall around time s."""
    return np.exp(-((TIME_S - s) / length_s) ** 2)


def drift(rate):
    """Random modulation: straight lines between normal random knots, rate knots a second."""
    knots = rng.standard_normal(N // 100)
    return np.interp(TIME_S * rate, np.arange(len(knots)), knots)


def cut(x, hz, kind, order=2):
    """Frequency selection: Butterworth filter."""
    sos = signal.butter(order, np.clip(hz, 10, .45 * SR), kind, fs=SR, output="sos")
    return signal.sosfilt(sos, x + 1e-18)


def add(track, s, sound):
    """Linear superposition: mix a sound into a track at time s."""
    start = int(np.clip(round(s * SR), 0, N))
    track[start:start + len(sound)] += sound[:N - start]


def from_db(db):
    """Logarithmic level: decibels to gain."""
    return 10 ** (np.asarray(db) / 20)


def rms_one(x):
    """Power normalisation: scale to rms 1."""
    return x / np.sqrt(np.mean(x ** 2) + 1e-20)


# the stove fades out and the quiet room takes over
FADE_START_S, FADE_LENGTH_S = 7.386, 0.94


def scene():
    """Superposition of sources: soup, ladle and burner in the kitchen, giving way to the quiet room."""
    vigour_db = simmer_vigour()
    stove = np.clip(1 - (TIME_S - FADE_START_S) / FADE_LENGTH_S, 0, 1)
    bubbling, fizz = simmer(vigour_db)
    soup = snaps(vigour_db, stove, level_db=10.5, tear_db=11.5, tear_s=0.00065, small_tear_db=-21)
    soup = soup + np.sqrt(stove) * fizz
    soup = soup + plops(level_db=2.0, daughter_db=-13, daughter_s=0.009, daughter_ratio=4.9,
                        tick_db=4.0, tick_s=0.0015)
    soup = pot_wall(soup + clusters(spread_octaves=1.1, spread_db=9.5, cycles=8, count=10))
    soup = soup + stove * bubbling + stirring(hiss_db=-21.5, slip_db=3.5, slip_rate=74)
    soup = kitchen(soup, near_db=-9.0, near_t60=0.04, room_db=-13.5, room_t60=0.087, dull_hz=5850)
    ladle = knocks(crack_db=-10.5, crack_s=0.0016, clatter_db=-24.5, clatter_t60=0.084, rattle_db=-17,
                   wall_rattle_db=6.5, rattle_t60=0.22, chatter_db=4.5, chatter_rate=300)
    ladle = kitchen(ladle, near_db=-18.5, near_t60=0.12, room_db=-16.5, room_t60=0.24, dull_hz=5000)
    room = quiet_room() + chirps(length_s=0.035, width_hz=114) + rustles(width=0.34)
    return (soup + ladle + stove * burner() + (1 - stove) * room + hum(stove))[None]


CUTOFF_HZ = 15900


def record(dry):
    """Band limitation: the small microphone drops the deepest bass, and a steep filter cuts the top."""
    thinned = cut(dry, 38, "high", order=4)
    top_cut = signal.ellip(10, .2, 70, CUTOFF_HZ, fs=SR, output="sos")
    return signal.sosfilt(top_cut, thinned)


dry = scene()
out = record(dry)
log_audio(out)
```